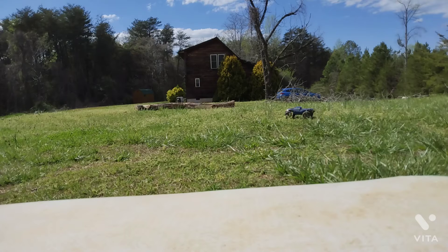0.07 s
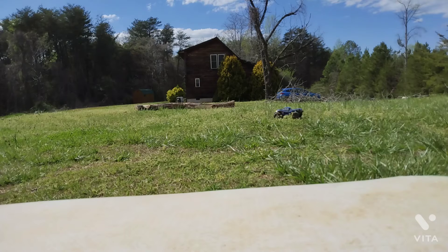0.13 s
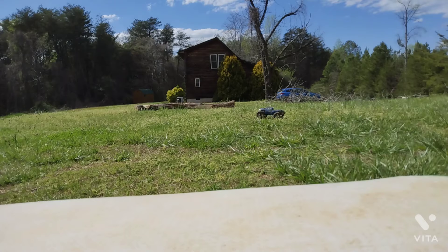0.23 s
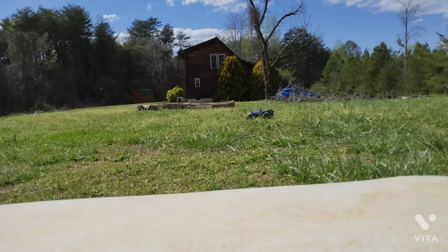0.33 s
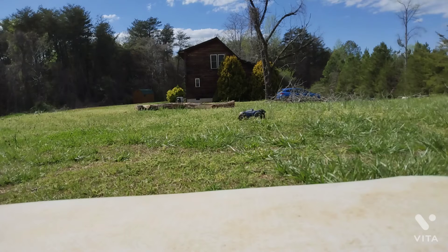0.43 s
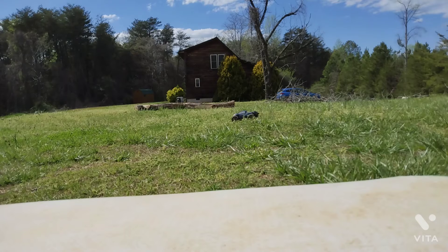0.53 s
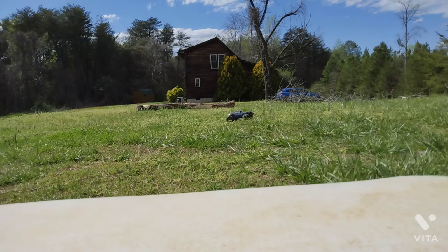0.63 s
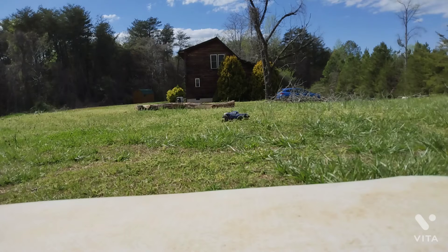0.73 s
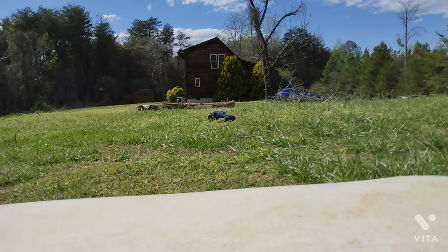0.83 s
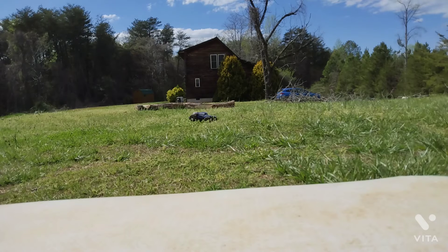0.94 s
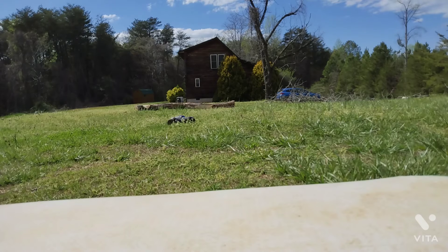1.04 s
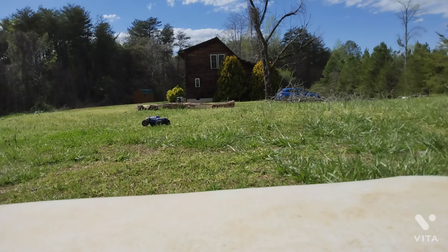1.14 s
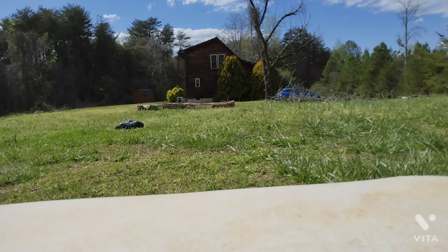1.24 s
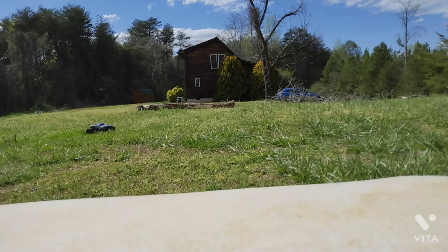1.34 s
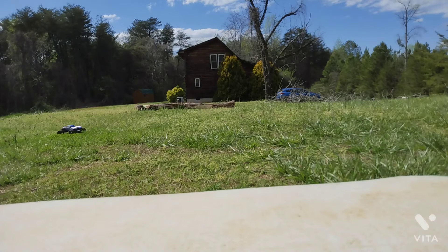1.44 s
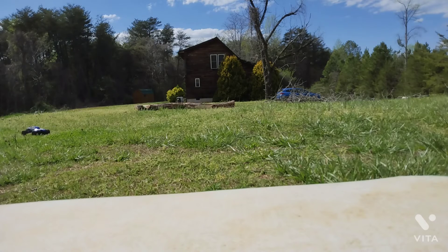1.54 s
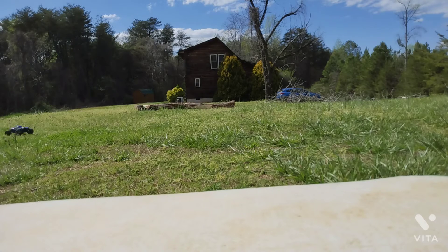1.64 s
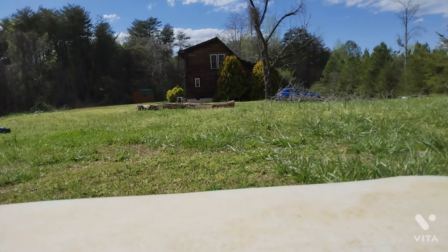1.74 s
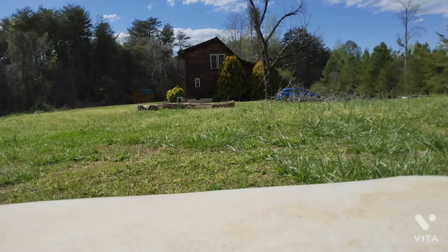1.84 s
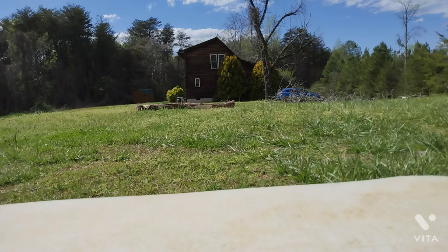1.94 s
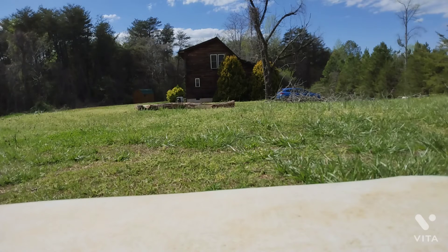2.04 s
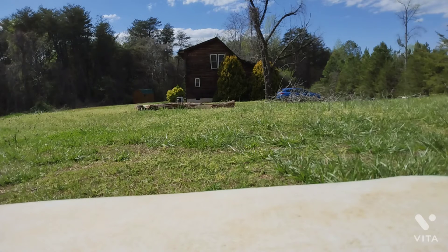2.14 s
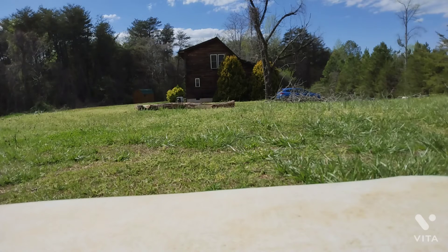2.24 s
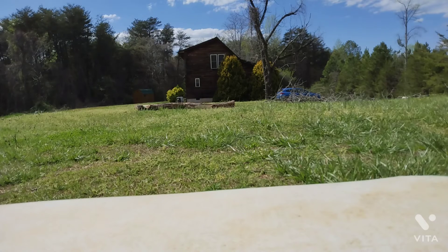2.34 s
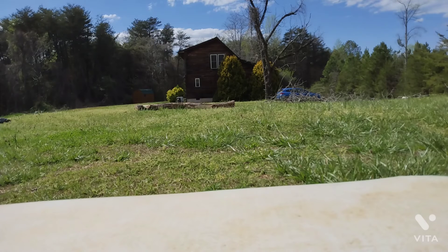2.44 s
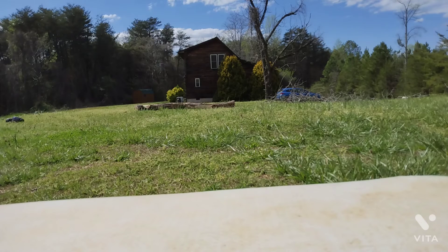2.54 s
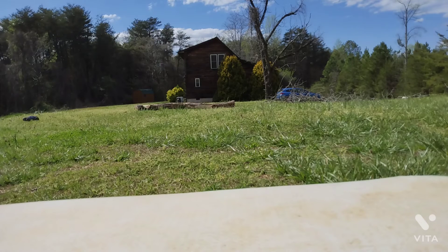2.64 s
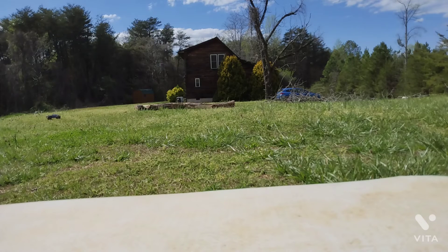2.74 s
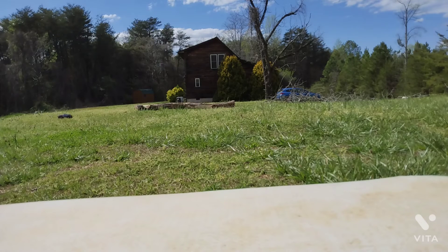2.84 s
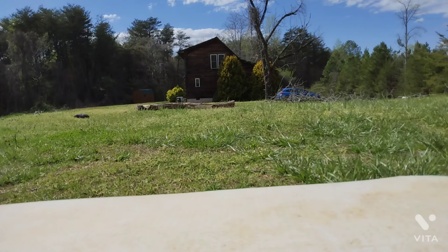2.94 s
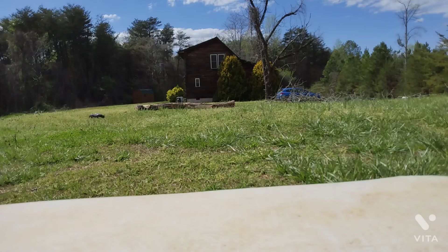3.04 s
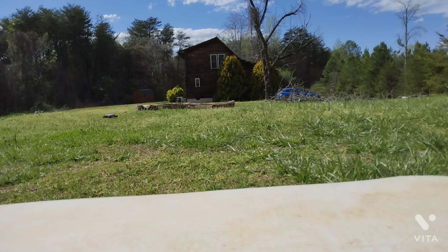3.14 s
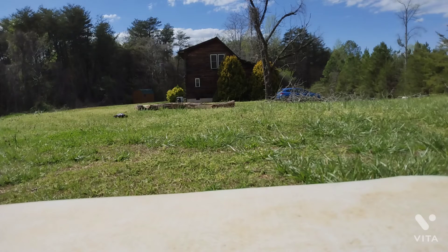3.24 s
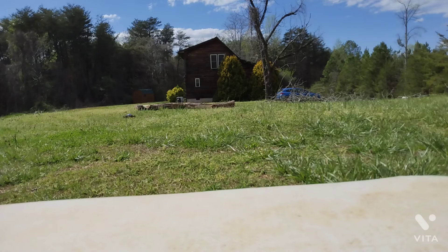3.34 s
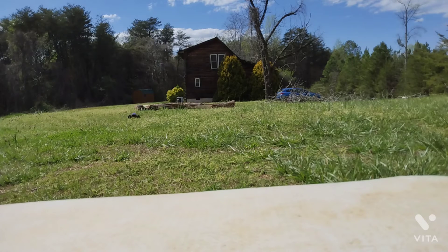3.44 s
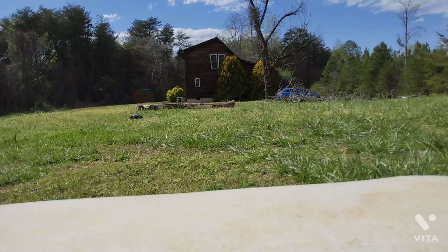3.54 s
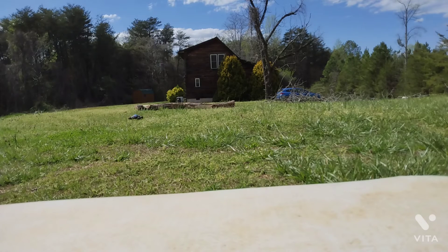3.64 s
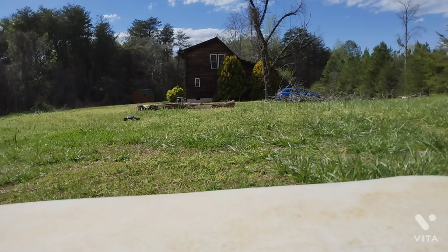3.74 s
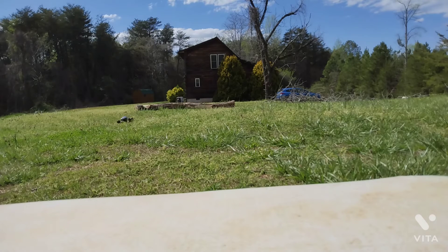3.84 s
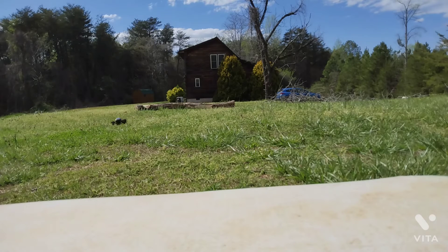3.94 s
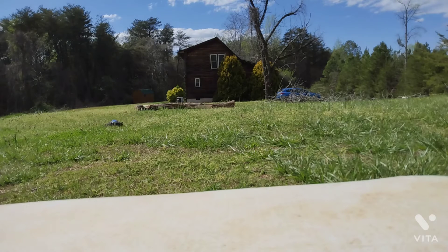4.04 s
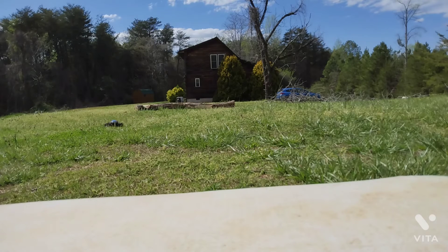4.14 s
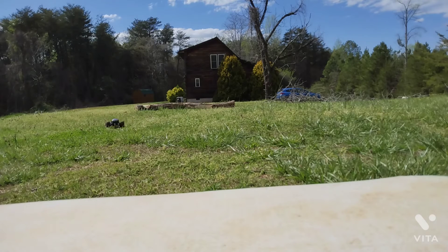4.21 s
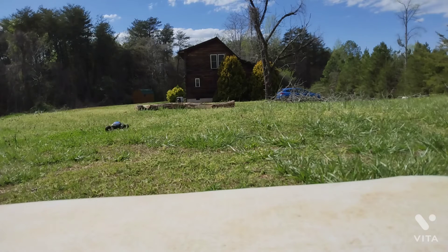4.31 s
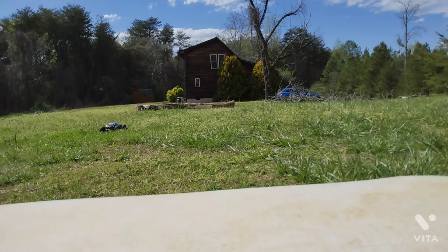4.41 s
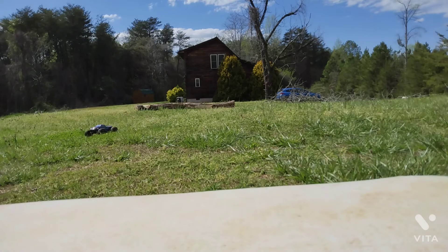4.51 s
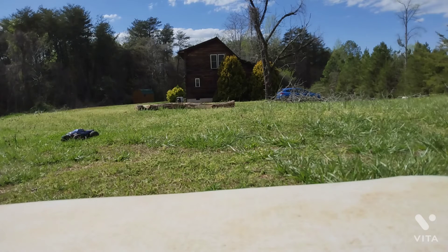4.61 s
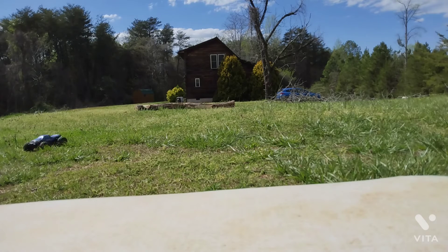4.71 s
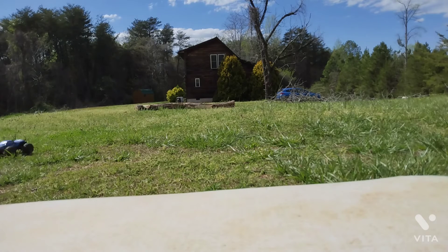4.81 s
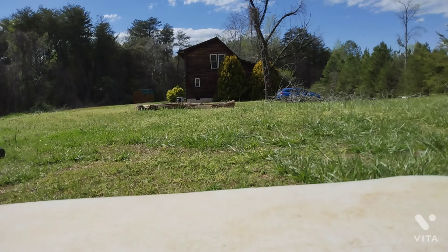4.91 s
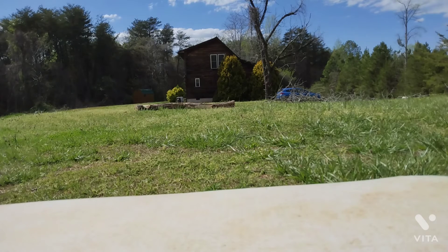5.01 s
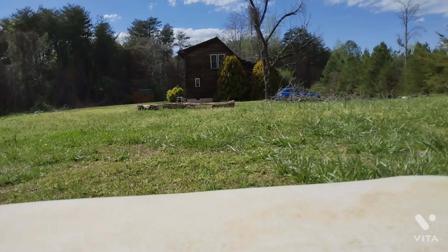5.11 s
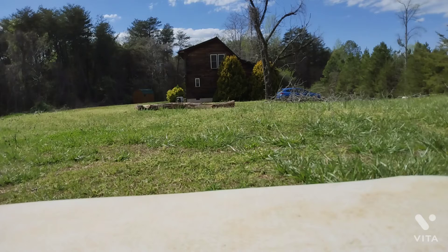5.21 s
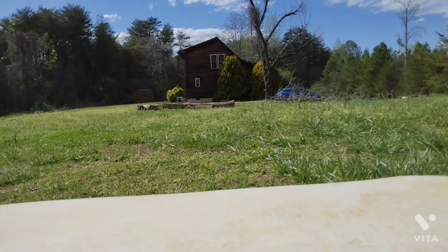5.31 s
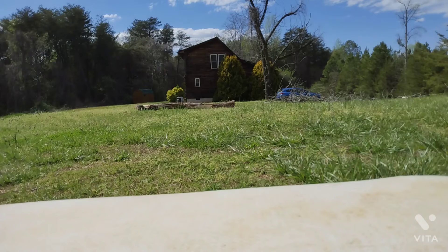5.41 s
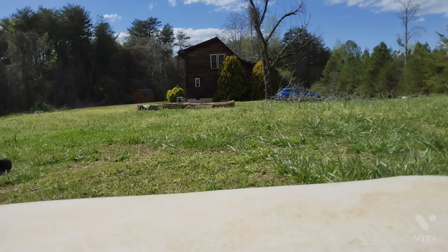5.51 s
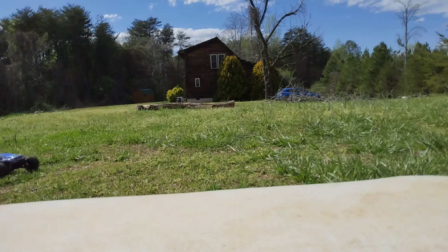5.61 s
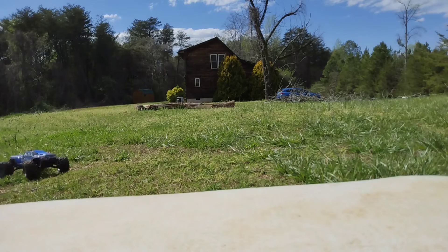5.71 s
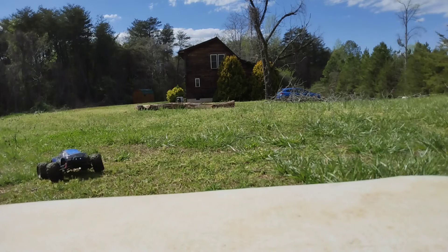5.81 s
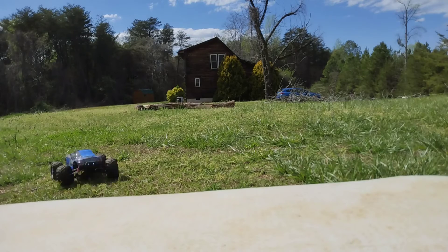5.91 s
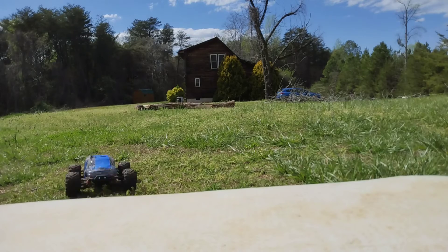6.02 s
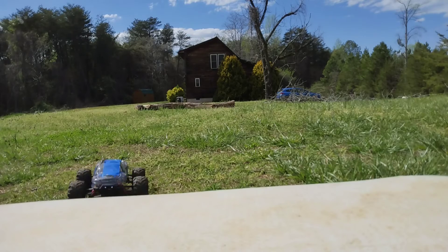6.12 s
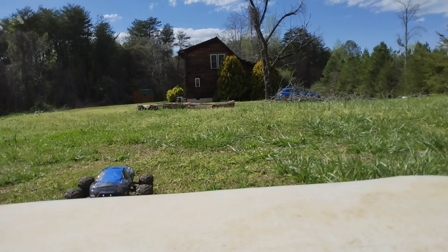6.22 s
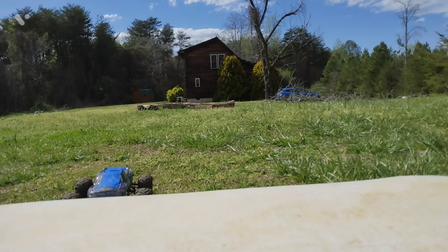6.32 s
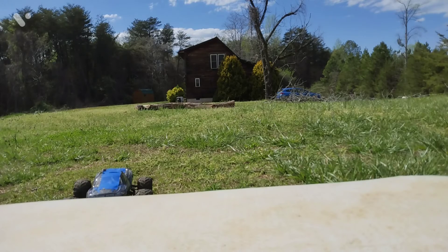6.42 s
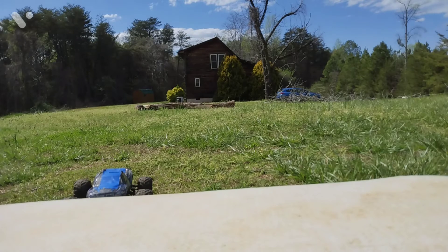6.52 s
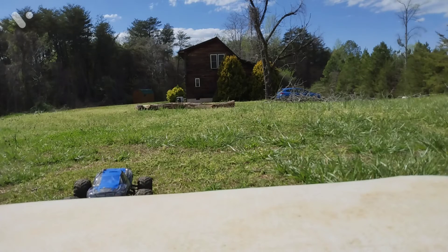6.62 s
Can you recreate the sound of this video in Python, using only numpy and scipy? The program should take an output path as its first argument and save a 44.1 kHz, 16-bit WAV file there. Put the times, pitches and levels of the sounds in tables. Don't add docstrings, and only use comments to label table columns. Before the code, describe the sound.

Outdoors on a lawn, a small remote-controlled truck spins up with a rising gear whine, rattles over bumps and moves off to the left as a coarse whir. It returns, knocks hard, brakes with a short hum, then whines again and stops close by. Handset clicks sound close on the right; soft gusts thump each side of the stereo microphone.

```python
import sys
import numpy as np
from scipy import signal
from scipy.fft import rfft, irfft, next_fast_len
from scipy.io import wavfile
from scipy.ndimage import uniform_filter1d, map_coordinates

SR = 44100
rng = np.random.default_rng(int(sys.argv[2]) if len(sys.argv) > 2 else 0)


def digitize_waveform(pressure):
    field = np.atleast_2d(pressure).T
    bounded = np.clip(field, -1, 1)
    quanta = np.round(bounded * 32767).astype(np.int16)
    wavfile.write(sys.argv[1], SR, quanta)


def rack_gain(trim_db):
    fader = np.asarray(trim_db, float)
    return 10 ** (fader / 20)


N = 293838
T = np.arange(N) / SR


def evened(x):
    return x / np.sqrt(np.mean(x ** 2) + 1e-20)


def curves(rows):
    s, *columns = np.transpose(rows)
    return [np.interp(T, s, c) for c in columns]


def colour(x, points):
    size = next_fast_len(x.shape[-1])
    f, db = np.transpose(points)
    gain = rack_gain(np.interp(np.log(np.fft.rfftfreq(size, 1 / SR) + 1), np.log(f + 1), db))
    return evened(irfft(rfft(x, size) * gain, size)[..., :x.shape[-1]])


def resonate(x, hz, width):
    r = np.exp(-np.pi * width / SR)
    return 2 * signal.lfilter([1 - r], [1, -r * np.exp(2j * np.pi * hz / SR)], x).real


def drift(hz):
    step = 16
    lowpass = signal.butter(2, hz, fs=SR / step, output="sos")
    slow = signal.sosfilt(lowpass, rng.standard_normal((N + SR) // step))
    return evened(np.interp(np.arange(N) + SR - step, np.arange(len(slow)) * step, slow))


def grains(per_s, spread_db):
    size = rack_gain(spread_db * np.minimum(rng.exponential(1, N), 4)) * rng.choice([-1., 1.], N)
    return evened(size * (rng.random(N) < per_s / SR))


def ring(x, modes, wander_db):
    out = 0
    for hz, width, db in modes:
        mode = resonate(resonate(x, hz, width * 1.6), hz, width * 1.6) / np.sqrt(width)
        out = out + rack_gain(db + wander_db * drift(9.6)) * mode
    return out


def below(x, top_hz, step_db):
    hz, t, z = signal.stft(x, SR, nperseg=512)
    over = (hz[:, None] / np.interp(t, T, top_hz) - 1) / 0.05
    return evened(signal.istft(z * rack_gain(step_db / (1 + np.exp(-over))), SR, nperseg=512)[1][:N])


def ports(x, lag):
    at = np.arange(N)
    left = map_coordinates(x, [at - lag / 2], order=3)
    right = map_coordinates(x, [at + lag / 2], order=3)
    return np.array([left, right])


def scattered(x):
    z = signal.stft(x, SR, nperseg=512)[2]
    field = rng.standard_normal((2, 2, *z.shape))
    field = evened(uniform_filter1d(uniform_filter1d(field, size=3, axis=2), size=8))
    return signal.istft(z * (field[0] + 1j * field[1]) / np.sqrt(2), SR, nperseg=512)[1][:, :N]


# time in seconds, shell drone in dB as it nears and leaves,
# throttle from 0 to 1, depth of grass from 0 to 1.
TRUCK = [(.56, -67, .4, .5), (.77, -82, .6, .6), (.89, -60, .65, .2), (.98, -58, 1, .66),
         (1.75, -52.5, .65, .4), (2.1, -64, .45, .85), (2.35, -61, .65, .6), (3.3, -65, .35, .55),
         (3.9, -65, .5, .4), (4.35, -52.5, .25, .33), (4.75, -50, .62, .42), (5.1, -60, .5, .25),
         (5.28, -75, .1, .65), (5.43, -57.5, .6, .45), (6.06, -49.5, .3, .62), (6.12, -53.5, .3, .34),
         (6.28, -55, 0, .1), (6.43, -76, .3, .6)]
# time in seconds, top of the gear grit in Hz.
SPEED = [(0, 3400), (.95, 3100), (1.3, 2800), (2., 2900), (2.3, 2000), (3.3, 2150), (3.8, 2750),
         (4.3, 2750), (4.66, 2750), (4.77, 3700), (5.2, 2650), (5.33, 3900), (5.8, 3600), (5.86, 5000),
         (6.05, 5300), (6.12, 4700), (6.66, 2800)]
# frequency in Hz, width in Hz, level in dB.
LOW_MODES = [(630, 143, 0), (408, 92, -10), (280.4, 168, -12), (794, 85, -17.5)]
# frequency in Hz, width in Hz, level in dB.
UPPER_MODES = [(1188, 203, 2.5), (993, 153, -5.5), (1681, 144, -7), (1462, 150, -8.5)]
# frequency in Hz, level in dB.
GRIT = [(1200, -12), (1600, -3.5), (2300, -5), (2900, -8), (3400, -11), (4000, -14), (4800, -15),
        (5600, -21), (7000, -26), (9000, -30)]
# frequency in Hz, level in dB.
SWISH = [(3000, 2.5), (5000, 3), (7000, 1), (9000, 0), (11000, 3.5), (13000, 3), (15500, 6), (17000, -4.5)]
UPPER_DB, UPPER_DB_FULL = -8, 18
GRIT_DB, GRIT_DB_FULL, GRIT_DB_PER_OCTAVE, CRUISE_HZ = -6, 10, 9, 2800
SWISH_DB, SWISH_DB_DEEP = -22, 24


def truck():
    drone_db, throttle, grass = curves(TRUCK)
    speed_hz, = curves(SPEED)
    upper_db = UPPER_DB + UPPER_DB_FULL * throttle
    swish_db = SWISH_DB + SWISH_DB_DEEP * grass
    grit_db = GRIT_DB + GRIT_DB_FULL * throttle + GRIT_DB_PER_OCTAVE * np.log2(speed_hz / CRUISE_HZ)
    bumps = evened(drift(14) + .8 * drift(60))

    shake = rng.standard_normal(N) + 0.61 * grains(700, 3.26)
    shell = evened(ring(shake, LOW_MODES, 0.8)) + rack_gain(upper_db) * evened(ring(shake, UPPER_MODES, 2.4))
    grit = colour(.5 * shake + rng.standard_normal(N) + 0.58 * grains(1500, 2.5), GRIT)
    grit = below(grit, speed_hz, step_db=-7.5)
    swish = colour(rng.standard_normal(N) + .5 * grains(2500, 1.6), SWISH)

    body = rack_gain(1.5 * bumps) * shell + rack_gain(grit_db + 1.6 * bumps + 1.4 * drift(30)) * grit
    return rack_gain(drone_db) * (body + rack_gain(swish_db + 1.8 * bumps + 1.5 * drift(22)) * swish)


# time in seconds, tooth rate in Hz, level in dB.
MESH = [
    [(.87, 980, -70), (.885, 1080, -51), (.912, 1450, -52), (.937, 1640, -48), (.957, 1900, -60),
     (.99, 2130, -58), (1.015, 2290, -53), (1.07, 2380, -56), (1.13, 2340, -58)],
    [(1.13, 2370, -58), (1.175, 2400, -51), (1.2, 2050, -58), (1.24, 2300, -50), (1.29, 2620, -59),
     (1.5, 2750, -68), (1.82, 3100, -57), (2.0, 2900, -68), (2.15, 2800, -80)],
    [(5.39, 850, -72), (5.43, 1020, -56), (5.47, 1220, -52), (5.59, 1330, -52), (5.62, 1650, -60),
     (5.65, 1760, -45), (5.69, 1790, -51), (5.71, 1790, -70)],
    [(5.7, 1350, -66), (5.8, 1400, -64), (5.84, 1550, -57), (5.91, 1600, -54), (5.965, 1680, -48),
     (6.02, 1760, -45), (6.035, 1750, -50), (6.068, 1750, -49), (6.08, 1700, -75)],
]
DOUBLE_DB = [-13, -20, -16, -5]
THROB_PER_TURN, THROB = 1 / 38, .55
SHAKY_HZ, SHAKY_AT_HZ, SHAKY_POWER = 42, 1600, 2.0


def gears():
    out = np.zeros(N)
    for rows, double_db in zip(MESH, DOUBLE_DB):
        hz, db = curves(rows)
        jitter_hz = SHAKY_HZ * (hz / SHAKY_AT_HZ) ** SHAKY_POWER * drift(162)
        turns = np.cumsum(hz + jitter_hz) / SR
        double = rack_gain(double_db + 4.5 * drift(35)) * np.sin(4 * np.pi * turns)
        tone = np.sin(2 * np.pi * turns) + double
        throb = 1 + THROB * np.sin(2 * np.pi * THROB_PER_TURN * turns)
        pulling = (T > rows[0][0]) * (T < rows[-1][0])
        out += np.sqrt(2) * rack_gain(db + 3.5 * drift(45)) * throb * tone * pulling
    return out


# start in seconds, length
# in seconds, frequency in Hz, level in dB.
SQUEALS = [(.94, 0.14, 5200, -66), (2.5, .55, 5200, -74), (2.898, 0.44, 3230, -77),
           (4.32, 0.15, 5130, -69.5), (5.506, 0.24, 4700, -59), (5.9, 0.07, 4600, -57),
           (1.03, .11, 4750, -63), (5.36, .42, 2600, -53.5), (5.68, .17, 2900, -54), (5.92, .17, 3450, -53),
           (5.96, .12, 4300, -58), (5.84, .13, 4750, -56), (5.85, .12, 3900, -57), (4.42, .36, 1900, -54),
           (4.61, .09, 1250, -52), (4.97, .2, 2550, -63), (.9, .05, 3250, -62), (4.3, .19, 6300, -70),
           (4.33, .15, 10800, -70)]


def squeals():
    out = np.zeros(N)
    for s, length, hz, db in SQUEALS:
        swell = np.sin(np.pi * np.clip((T - s) / length, 0, 1))
        out += rack_gain(db + 2.5 * drift(40)) * swell * evened(resonate(rng.standard_normal(N), hz, 330))
    return out


# start in seconds, held until in seconds, released in seconds, level in dB.
BRAKE = [
    (4.8, 4.85, 4.89, -59),
    (4.96, 5.15, 5.24, -61),
    (6.09, 6.24, 6.56, -54),
]
BRAKE_ORDERS = 2 * [[(1, -11), (2, 0), (3, -11), (4, -22), (5, -30)]] + [[(1, -13), (2, 0), (3, -30),
                (4, -29), (5, -17)]]
BRAKE_HZ, BRAKE_RISE_S, BRAKE_SAG_DB_PER_S = 894, .05, 68


def brake_hum():
    out = np.zeros(N)
    turns = np.cumsum(BRAKE_HZ + 1.2 * drift(8)) / SR
    for (start, held, released, level_db), orders in zip(BRAKE, BRAKE_ORDERS):
        hum = sum(rack_gain(db + 2.5 * drift(25)) * np.sin(2 * np.pi * k * turns) for k, db in orders)
        pressed = np.clip(np.minimum(T - start, released - T) / BRAKE_RISE_S, 0, 1)
        out += rack_gain(level_db - BRAKE_SAG_DB_PER_S * np.maximum(T - held, 0)) * pressed * hum
    return np.sqrt(2) * out


# time in seconds, level in dB.
PEEP = [
    (5.34, -97),
    (5.35, -66),
    (5.4, -68),
    (5.41, -95),
]
PEEP_HZ = 5170


def servo_peep():
    on = (T > PEEP[0][0]) * (T < PEEP[-1][0])
    return np.sqrt(2) * rack_gain(curves(PEEP)[0]) * np.sin(2 * np.pi * PEEP_HZ * T) * on


# time in seconds, sharp edge in dB, shell ring in dB.
KNOCKS = [(0.0338, -57, -50), (0.4834, -56, -48), (0.803, -58, -62), (0.8859, -54, -46), (0.9941, -48, -50),
          (1.0311, -48, -48), (1.1408, -48, -46), (1.1692, -48, -46), (1.2421, -46, -46),
          (1.9405, -54, -52), (3.8611, -62, -56), (4.3041, -58, -50), (4.5077, -52, -48), (4.782, -60, -39),
          (5.1053, -52, -54), (5.2894, -60, -72), (5.881, -52, -44), (5.941, -52, -42), (6.194, -66, -46),
          (6.293, -64, -45), (6.322, -56, -70), (6.363, -70, -56), (1.5444, -56, -49), (1.997, -50, -41),
          (2.0637, -51, -48), (2.1281, -45, -57), (2.1635, -54, -46.5), (2.3331, -56, -49),
          (3.0454, -57.5, -49), (3.4754, -66, -51), (3.9407, -61, -53), (4.2338, -61, -45),
          (4.4242, -37, -50), (4.4463, -44, -62), (4.7142, -41, -38.5), (4.7895, -42, -53.5),
          (5.308, -50, -63), (5.335, -51, -56), (5.4151, -65, -62), (5.914, -37, -38), (6.135, -58, -42),
          (6.213, -64, -43), (6.3044, -58, -47), (6.456, -56, -60), (4.042, -50, -66), (4.052, -52, -66),
          (4.136, -54, -64), (4.403, -44, -60), (4.357, -48, -60), (6.43, -56, -66), (3.69, -56, -66)]
HOLLOW_DB, HOLLOW_DB_FULL = 8, -14


def knocks():
    edges, blows, t = np.zeros(N), np.zeros(N), np.arange(1300) / SR
    noises = rng.standard_normal((len(KNOCKS), len(t)))
    for (s, edge_db, ring_db), noise in zip(KNOCKS, noises):
        start = round(s * SR)
        edge = rack_gain(edge_db - 10.5 - 60 * t / 0.026) * np.diff(noise, prepend=0)
        edges[start:][:len(t)] += edge * np.minimum(t / 0.0025, 1)
        blows[start:][:len(t)] += rack_gain(ring_db - 60 * t / 0.024) * noise
    hollow_db = HOLLOW_DB + HOLLOW_DB_FULL * curves(TRUCK)[1]
    low = ring(blows * rack_gain(hollow_db), LOW_MODES, 0)
    upper = ring(blows / rack_gain(hollow_db / 2), UPPER_MODES, 0)
    return edges + rack_gain(38.5) * (low + upper)


# time in seconds, crack
# in dB, first bright edge in dB, # ring of the handset in dB, frequency of that ring in Hz.
CLICKS = [(0.2498, -63.5, -77, -51, 612), (0.2997, -55.5, -73, -48.5, 710), (1.6127, -47, -70, -35.5, 615),
          (1.6871, -41, -64, -31, 686), (3.6626, -51, -48, -49, 638), (3.9594, -57, -70, -60, 660),
          (4.0696, -46, -44, -43.5, 666), (4.7521, -40, -36, -31, 665), (5.2185, -48, -56, -44.5, 660),
          (6.0254, -37, -46, -40, 715), (6.03, -37, -44, -38, 700), (6.036, -36, -42, -40, 640),
          (6.0606, -34, -40, -28, 700), (6.4996, -59, -75, -46, 650), (6.539, -58, -76, -54, 690),
          (6.5685, -60, -76, -48, 670)]
# frequency in Hz, level in dB.
CLICK = [(300, -0.5), (1000, -0.5), (2000, 0.5), (3500, 0), (5500, -5.5), (8000, -12.5), (12000, -15),
         (16000, -16)]
SNAP_LOW_HZ, SNAP_DROP_HZ, SNAP_S = 3400, 10000, .0017


def handset():
    out, t = np.zeros(N), np.arange(2200) / SR
    chirp = np.sin(2 * np.pi * np.cumsum(SNAP_LOW_HZ + SNAP_DROP_HZ * np.exp(-t / SNAP_S)) / SR)
    snap = 2.3 * chirp * np.minimum(t / .0024, 1) ** 2
    noises = rng.standard_normal((len(CLICKS), 2, len(t)))
    for (s, db, edge_db, ring_db, hz), noise in zip(CLICKS, noises):
        edge = .5 * np.diff(noise[0], prepend=0) + snap
        edge = edge * rack_gain(edge_db - 60 * t / 0.012) * np.minimum(t / 0.0006, 1)
        crack = colour(noise[1], CLICK) * rack_gain(db + 2 - 60 * t / 0.03) * np.minimum(t / 0.0018, 1)
        case = np.sin(2 * np.pi * hz * t) * rack_gain(ring_db + 8 - 60 * t / 0.031)
        case = case * np.minimum(t / .006, 1) ** 2
        out[round(s * SR) - 30:][:len(t)] += edge + crack + case
    to_right = rack_gain(np.array([[-2.5], [1.5]]))
    return (ports(out, 15) + rack_gain(-7) * scattered(out)) * to_right


# time in seconds, level in dB, frequency in Hz,
# port (0 left, 1 right).
THUMPS = [(0.471, -33.1, 107, 1), (0.752, -40.8, 85, 1), (0.88, -41.0, 103, 0), (1.179, -38.3, 91, 1),
          (1.424, -35.0, 98, 1), (1.462, -27.3, 113, 1), (1.56, -30.1, 87, 1), (1.839, -33.7, 88, 1),
          (1.914, -37.4, 100, 0), (1.98, -36.1, 95, 0), (2.988, -42.5, 82, 1), (3.735, -48.0, 116, 1),
          (3.972, -45.9, 91, 1), (4.007, -44.1, 94, 1), (4.353, -32.8, 93, 1), (4.404, -39.2, 100, 0),
          (4.517, -36.8, 90, 0), (4.577, -34.0, 97, 1), (4.62, -32.8, 88, 1), (4.925, -30.8, 97, 1),
          (4.943, -38.4, 110, 0), (5.021, -38.1, 93, 0), (5.421, -32.3, 103, 0), (5.67, -35.1, 110, 0),
          (5.767, -29, 125, 1), (5.793, -23.4, 83, 1), (5.902, -30.7, 96, 1), (6.041, -32.4, 100, 0),
          (6.486, -26.6, 129, 1), (6.535, -26.0, 105, 1)]
THUMP_S, THUMP_S_PER_DB, THUMP_SAG, THUMP_SLAP = .007, .00008, .15, .3


def thumps():
    out, t = np.zeros((2, N + SR)), np.arange(-3000, 3000) / SR
    for (s, db, hz, port), phase in zip(THUMPS, rng.random(len(THUMPS))):
        u = t / (THUMP_S + THUMP_S_PER_DB * (db + 45))
        turns = np.cumsum(hz * (1 - THUMP_SAG * np.tanh(u))) / SR
        slap = THUMP_SLAP * np.sin(2 * np.pi * turns)
        swing = rack_gain(db + 6) * np.exp(-abs(u)) * np.sin(2 * np.pi * (turns + phase) + slap)
        out[round(port), round((s + t[0]) * SR):][:len(t)] += swing
    return out[:, :N]


# time in seconds, level in dB, left minus right in dB.
WIND = [(0, -63, -4), (.3, -60, -4), (.6, -50, -5), (1.3, -53, 0), (1.5, -44, -10), (1.95, -42, -2),
        (2.11, -61, 0), (2.5, -57, 0), (3.75, -75, -4), (4.2, -56, 0), (4.35, -43, -8), (4.6, -41, -5),
        (4.8, -52, -2), (5.07, -44, -2), (5.24, -61, 3), (5.97, -36, -1), (6.35, -58, 2), (6.66, -38, -10)]
# frequency in Hz, density in dB per Hz.
RUMBLE = [(12, -64), (20, -57), (27, -43.5), (50, -5), (85, 0), (150, -7.5), (230, -22), (400, -41),
          (800, -87)]


def wind():
    db, pan_db = curves(WIND)
    lumps = np.array([3.67 * drift(23.5) for port in range(2)]) + 0.63 * drift(4)
    eddies = colour(rack_gain(lumps) * rng.standard_normal((2, N)), RUMBLE)
    push = eddies * rack_gain(db + 0.5 + np.array([pan_db, -pan_db]) / 2) + thumps()
    strained = .16 * np.tanh(push * (1 + 5 * abs(push)) / .16)
    return signal.sosfilt(signal.butter(2, 42, "high", fs=SR, output="sos"), strained)


# frequency in Hz, density in dB per Hz.
AIR = [(120, 6), (200, -12.5), (508, -2), (644, -7), (817, -6.5), (1220, -8), (1490, -15), (2830, -20.5),
       (14700, -28.5), (15800, -35)]
AIR_DB = -58.5


def air():
    noise = rng.standard_normal((3, N))
    return rack_gain(AIR_DB - 6.5) * colour(noise[:2] + 0.87 * noise[2], AIR)


# time in seconds, lag of the left port in samples.
BEARING = [(.4, 6), (.7, 1.5), (1., .6), (1.28, -3.8), (1.6, -8.5), (1.87, -11.6), (2.2, -14), (2.6, -13),
           (3.1, -9.2), (3.55, -5.5), (4., -5.5), (4.7, -8), (5., -14.5), (5.3, -14.3), (5.75, -12.6),
           (5.99, -10.5), (6.17, -7.4), (6.66, -5)]


def scene():
    moving = truck() + gears() + squeals() + brake_hum() + servo_peep() + knocks()
    near = ports(moving, curves(BEARING)[0]) + rack_gain(-9) * scattered(moving)
    return near + wind() + air() + handset()


def smooth(power, size=14):
    return uniform_filter1d(uniform_filter1d(power, size=size, axis=0), size=5) + 1e-20


def top_cut(x):
    return signal.sosfilt(signal.butter(12, 16140, fs=SR, output="sos"), x)


def record(dry):
    return top_cut(dry)


dry = scene()
out = record(dry)
digitize_waveform(out)
```